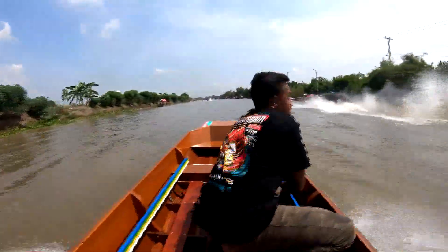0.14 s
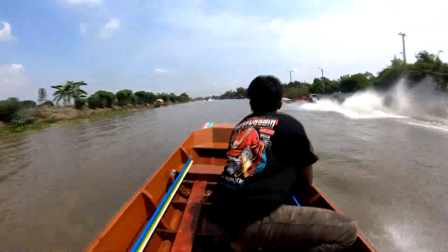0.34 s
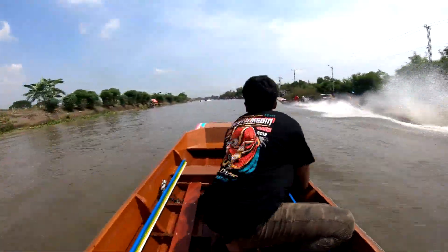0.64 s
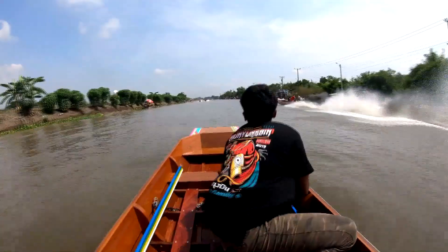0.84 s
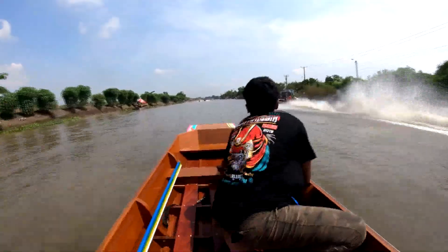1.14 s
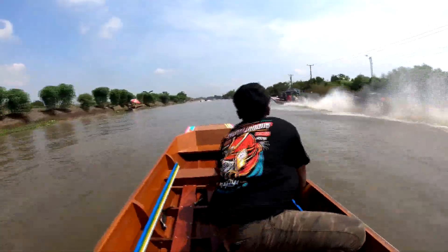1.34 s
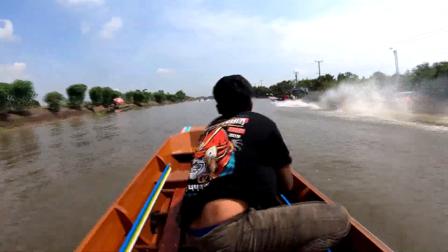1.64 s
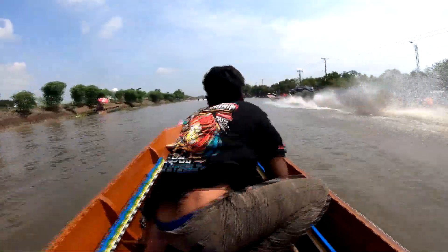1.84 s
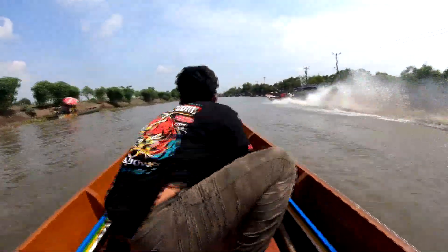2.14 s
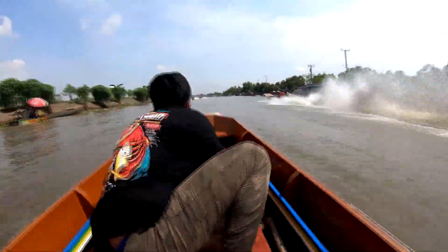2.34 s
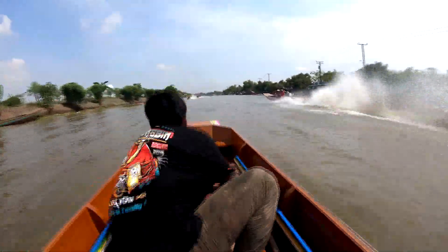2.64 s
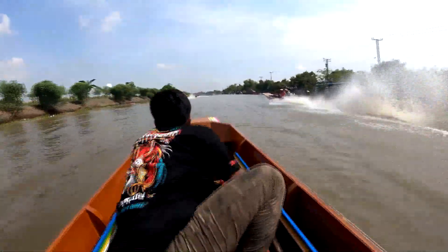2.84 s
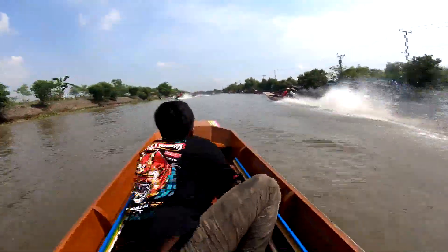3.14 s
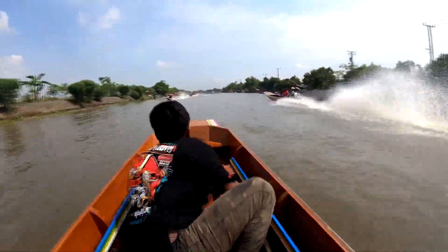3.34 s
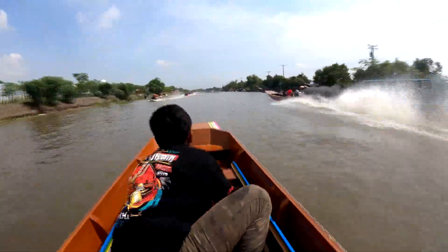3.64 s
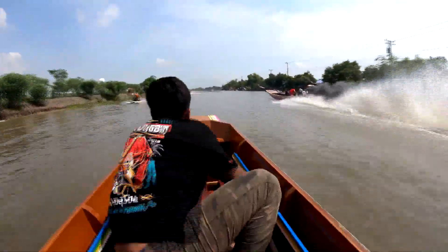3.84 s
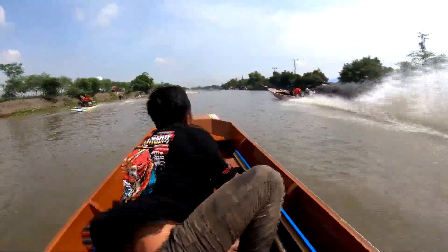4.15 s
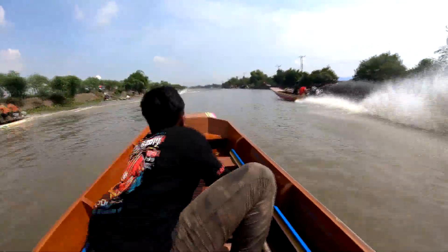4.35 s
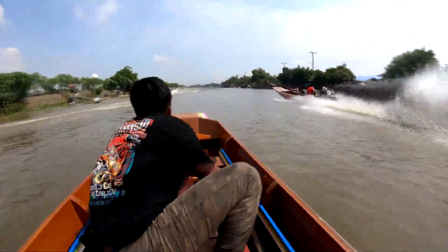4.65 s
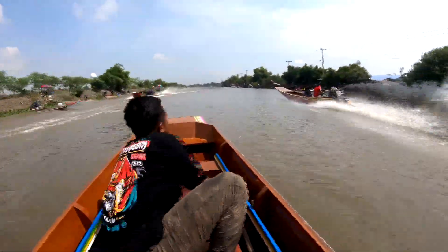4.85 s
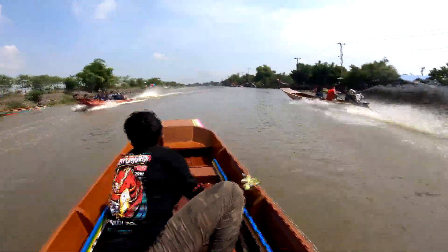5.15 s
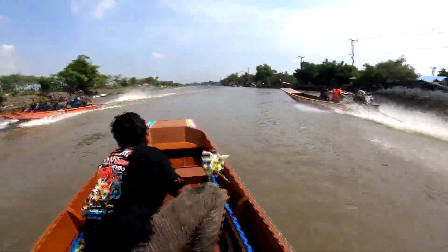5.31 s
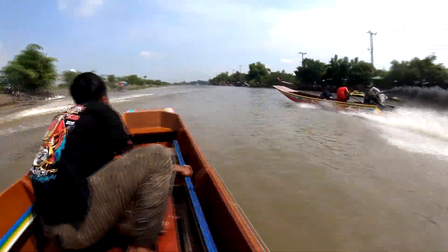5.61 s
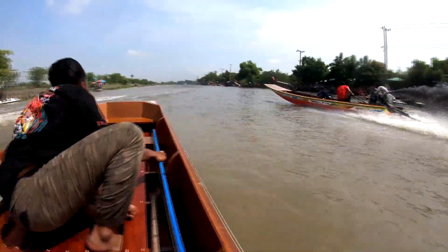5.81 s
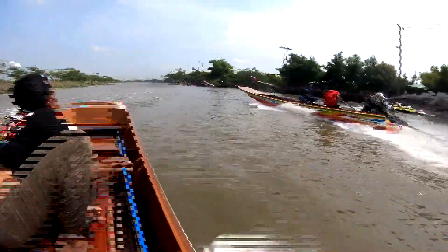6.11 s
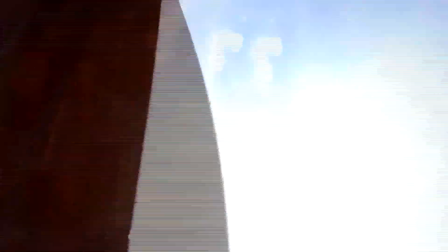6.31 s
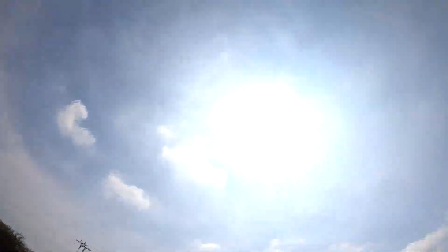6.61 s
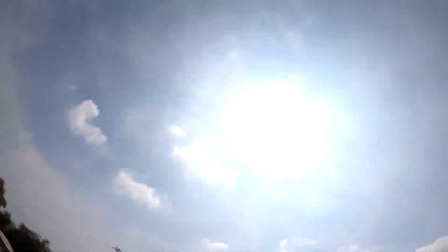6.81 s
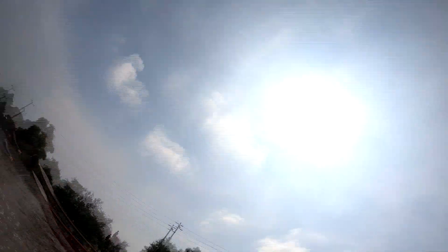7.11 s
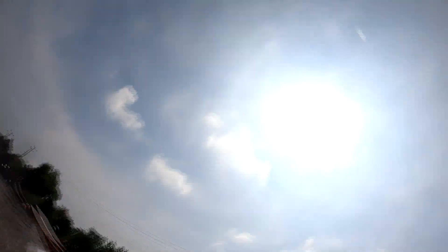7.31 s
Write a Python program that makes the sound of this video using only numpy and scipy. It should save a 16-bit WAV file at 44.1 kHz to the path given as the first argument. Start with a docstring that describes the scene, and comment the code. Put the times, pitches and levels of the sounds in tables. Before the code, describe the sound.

Onboard a speeding river boat: rising motor drone, roaring wind on the microphone, spray spits, regular ticks, a passing boat's falling note, then engine slowdown.

```python
"""Ride in a racing long-tail boat

A turbocharged engine winds up, holds full throttle beside a rival, then backs off: harmonics plus pipe pulses.
Headwind is shaped noise that buffets, roars and crackles, with chirped snaps; turbo air hisses and whistles.
Noise bursts make spray and wash; another boat passes with a falling note.
The waveform itself jumps at regular splices, ticking about every half second, some ticks faint or silent."""
import sys
import numpy as np
from scipy import signal
from scipy.fft import rfft, irfft, next_fast_len
from scipy.io import wavfile
from scipy.ndimage import uniform_filter1d, minimum_filter1d, map_coordinates

SR = 44100
rng = np.random.default_rng(int(sys.argv[2]) if len(sys.argv) > 2 else 0)


def dump_mix(stems):
    """Bounce the given channels to the path in sys.argv[1] as a 16-bit WAV at rate SR."""
    frames = np.atleast_2d(stems).T  # one column per channel
    limited = np.clip(frames, -1, 1)  # hard clip at full scale
    pcm = np.round(limited * 32767).astype(np.int16)
    wavfile.write(sys.argv[1], SR, pcm)


N = 329427

# own engine: (time [s], firing rate [Hz], level [dB])
ENGINE_COURSE = [(0, 102.9, -22), (.17, 109, -20), (.35, 117, -27), (.52, 124, -22.5), (.7, 133, -28.5),
                 (.82, 141, -19.5), (1, 145, -17), (1.37, 150, -20), (1.6, 153, -17), (1.85, 154, -20),
                 (2.5, 155.5, -21.5), (2.8, 155.8, -18), (3.2, 155.5, -20), (3.38, 156, -15),
                 (3.54, 157, -23.5), (3.71, 157.5, -15.5), (3.87, 159.5, -24), (4.95, 161, -24.5),
                 (5.3, 161.3, -22), (5.47, 161.3, -25), (5.58, 161.2, -23), (6.15, 164, -26),
                 (6.25, 174.2, -24.5), (6.35, 162.2, -25), (6.4, 150.9, -17), (6.46, 137.2, -21),
                 (6.55, 133.1, -30), (6.92, 128, -24), (7.05, 111, -19), (7.25, 73, -23.5), (7.47, 66, -32)]
# headwind at the microphone: (time [s], strength [dB], extra crackle [dB])
WIND_COURSE = [(0, -5.5, -5), (.3, -10.5, 2.5), (.62, -1.5, 0), (1.3, -3, -0.5), (1.75, -2.5, -2),
               (2.2, 1.5, 0), (2.4, 1, -5.5), (2.75, -3, 1.5), (3.1, -2.5, 3), (3.4, 0, 2), (3.85, 4.5, -4),
               (4.2, 0.5, 0.5), (4.8, -1, 2), (5.2, -3, 3.5), (5.5, 4.5, -1.5), (5.85, 3.5, -5),
               (6.12, 2.5, -6.5), (6.7, 3.5, -1.5), (7.1, 1.5, -1.5), (7.47, 3.5, -2)]
TOP_HZ = 16000  # upper band limit
TONE_FADE_DB = 31.5  # what a sound gains over its rise and loses over its fade
# the microphone swings into the lee of the hull: the wind drops, stays low, then returns
LEE_S, LEE_DROP_S, LEE_HOLD_S, LEE_RETURN_S = 6.165, 0.058, 0.093, 0.22
LEE_CRACKLE_DB = -16.5


def amp(db):
    """Level to amplitude: 20 dB is a factor of ten."""
    return 10 ** (np.asarray(db) / 20)


def unit(x):
    """Normalise the mean power, so that the rms is 1."""
    return x / np.sqrt(np.mean(x ** 2) + 1e-20)


def curves(rows):
    """Linear interpolation in time: one value per sample for each column after the time."""
    s, *columns = np.transpose(rows)
    t = np.arange(N) / SR
    return [np.interp(t, s, column) for column in columns]


def wobble(rate):
    """Slow random modulation: a smooth spline through random knots, rate of them a second."""
    knots = rng.standard_normal(int(N * rate / SR) + 4)
    return map_coordinates(knots, [np.arange(N) * rate / SR])


def filtered(x, response):
    """Linear filtering: the spectrum of x times a response of frequency."""
    m = next_fast_len(N + SR // 2)
    spectrum = rfft(x, m) * response(np.fft.rfftfreq(m, 1 / SR))
    return irfft(spectrum, m)[..., :N]


def coloured(x, points):
    """Spectral shaping: x filtered along (frequency [Hz], level [dB]) points, at rms 1."""
    f, db = np.transpose(points)
    return unit(filtered(x, lambda hz: amp(np.interp(np.log(hz + 1), np.log(f), db))))


def noise():
    """White noise: equal mean power at every frequency."""
    return rng.standard_normal(N)


def steadied(x, seconds, share):
    """Gain control by short-time power: evens out a share of the chance swells of a noise."""
    power = np.abs(uniform_filter1d(x ** 2, max(int(seconds * SR), 2))) + 1e-3
    return unit(x / power ** (np.clip(share, 0, 1) / 2))


def swell(start, rise, hold, fade):
    """Straight-line envelope: 0 at the start, 1 in the hold, 0 after the fade, below 0 outside."""
    t = np.arange(N) / SR - start
    return np.minimum(1, np.minimum(t / rise, 1 - (t - rise - hold) / fade))


def lee():
    """Aerodynamic shelter: how far the hull shields the microphone, 0-1."""
    return np.maximum(0, swell(LEE_S, LEE_DROP_S, LEE_HOLD_S, LEE_RETURN_S))


def bursts(rows):
    """Exponential attack and decay: envelope of (time [s], level [dB], decay time [s]) bursts."""
    fall_db, rise_share = 8.5, 0.55  # dB lost per decay time, rise time over decay time
    power, t = np.zeros(N), np.arange(N) / SR
    for s, db, decay in rows:
        near = slice(max(0, round((s - 2 * decay) * SR)), round((s + 10 * decay) * SR))
        lag = (t[near] - s) / decay
        power[near] += amp(db - fall_db * np.maximum(lag, -lag / rise_share)) ** 2
    return np.sqrt(power)


def whistle(hz, db, presence, waver):
    """Frequency and amplitude modulation: a tone whose pitch and level waver at random."""
    flutter_db = 3 * wobble(25)
    gain = amp(db + TONE_FADE_DB * (presence - 1) + flutter_db)
    cycles = np.cumsum(hz * (1 + waver * wobble(120))) / SR
    return np.sqrt(2) * gain * np.sin(2 * np.pi * cycles)


def ticks():
    """Step discontinuity: the waveform leans one way, jumps within a sample at a splice and settles."""
    # size of the waveform step on each beat: (height [full scale 1])
    step_heights = [.17, 0.73, 0.28, 0.23, 0.12, 0.65, 0.24, 0.054, .11, 0.067, 0.45, 0.3, 0, 0.33]
    start_s, beat_s, settle_s = .3186, .512, 0.0023
    out, t = np.zeros(N), np.arange(N) / SR
    for beat, height in enumerate(step_heights):
        s = start_s + beat * beat_s
        near = slice(round(s * SR) - SR // 100, round(s * SR) + SR // 100)
        lag = t[near] - s
        side = np.where(lag < 0, -1, 1)
        out[near] += height / 2 * side * np.exp(-np.abs(lag) / settle_s)
    return out


def wind():
    """Turbulence: big eddies buffet, small ones roar, and pressure peaks tear into crackle."""
    # spectra of the three layers: (frequency [Hz], density [dB per Hz])
    buffet_colour = [(10, -38.5), (22, -7), (42, 1), (70, 4.5), (120, 2), (170, -11.5), (260, -33),
                     (500, -86.5)]
    roar_colour = [(70, -7.5), (128, -1), (158, 0), (195, 2), (250, -4.5), (310, -6.5), (410, -14.5),
                   (500, -23), (570, -45.5), (900, -83)]
    crackle_colour = [(400, -12), (570, -6.5), (740, 3.5), (950, -0.5), (1120, -17), (1300, -3.5),
                      (1750, -2.5), (2300, -9), (3100, -15), (3900, -13.5), (5500, -28), (8500, -29),
                      (11000, -58), (14000, -96)]
    # brief changes, mostly lulls, in buffet and roar: (time [s], change [dB])
    lulls = [(.41, -2), (.51, -17), (.75, -11), (1.77, -4), (3.53, -6), (4.11, -3.5), (4.22, -7.5),
             (4.87, -10), (5.1, 0.5)]
    # single gusts that thump in the roar: (time [s], boost [dB])
    gusts = [(.05, 6), (0.461, 9.5), (1.4, 4.5), (2.2, 4), (3.48, 3.5), (4.7, 2.5), (4.83, 7.5)]
    lull_width_s, gust_width_s = 0.013, 0.034  # from the middle to 1/e of the change in dB
    t = np.arange(N) / SR
    strength_db, extra_db = curves(WIND_COURSE)
    shelter = lee()
    eddies = wobble(26)  # fast eddies shake roar and crackle together
    # out of the lee the microphone faces upward, and the roar is softer
    upward = np.clip((t - LEE_S) / LEE_DROP_S, 0, 1)
    gust_db = sum(db * np.exp(-((t - s) / gust_width_s) ** 2) for s, db in gusts)
    lull_db = sum(db * np.exp(-((t - s) / lull_width_s) ** 2) for s, db in lulls)
    # in strong wind the crackle sputters more
    sputter_db = 0.34 * amp(0.49 * strength_db) * eddies

    # each layer: level at strength 0, dB gained per dB of strength, change in the lee
    buffet_db = -17 + 0.053 * strength_db - 10 * shelter + lull_db
    roar_db = -19 + strength_db - 14.5 * shelter - upward + lull_db
    roar_db = roar_db + gust_db + 1.16 * eddies
    crackle_db = -38 + 1.28 * strength_db + LEE_CRACKLE_DB * shelter + extra_db + sputter_db

    buffet = steadied(coloured(noise(), buffet_colour), seconds=0.1, share=0.2)
    uneven = noise() * amp(2.73 * wobble(90))
    roar = steadied(coloured(uneven, roar_colour), seconds=.06, share=.75)
    pressure = np.clip(unit(buffet + roar), -2, 2)
    crackle = coloured(noise() * amp(1.5 * pressure + 2.0 * wobble(60)), crackle_colour)
    return amp(buffet_db) * buffet + amp(roar_db) * roar + amp(crackle_db) * crackle


def torn_air(rows):
    """Broadband turbulence: noise bursts from (time [s], level [dB], decay time [s]) rows."""
    # spectrum of torn air: (frequency [Hz], density [dB per Hz])
    torn_colour = [(300, -9), (570, -5.5), (780, 7.5), (1120, -15), (1400, 0.5), (1800, 1.5), (2600, -9.5),
                   (3500, -7.5), (4600, -24.5), (9000, -44), (13000, -89.5)]
    return bursts(rows) * steadied(coloured(noise(), torn_colour), seconds=0.0035, share=0.24)


def surges():
    """Flow separation: longer surges of torn airflow."""
    # surges: (time [s], level [dB], decay time [s])
    surge_rows = [(1.971, -27, .008), (2.17, -30, .0061), (2.211, -28, 0.0036), (3.764, -27.5, 0.0027),
                  (3.799, -28, 0.0063), (6.192, -23, .004), (6.562, -29, 0.014), (6.583, -31, 0.0077),
                  (6.628, -27, 0.018), (6.662, -29.5, 0.014), (6.691, -29.5, 0.006), (6.754, -26, .005),
                  (6.828, -28, 0.012), (6.86, -31.5, .022), (6.935, -33, 0.022), (7.33, -32.5, 0.023)]
    return torn_air(surge_rows)


def chirp(db, pitch, peak_s):
    """Frequency glide: a quick downward zip rides on a single push and pull of pressure."""
    start_hz, end_hz, glide_s = 3866, 955, 0.00124
    push_hz, push_db = 149, 10
    t = np.arange(SR // 60) / SR
    hz = pitch * (end_hz + (start_hz - end_hz) * np.exp(-t / glide_s))
    envelope = (t / peak_s * np.exp(1 - t / peak_s)) ** 2
    zipping = np.sin(2 * np.pi * np.cumsum(hz) / SR) * envelope
    push = np.sin(2 * np.pi * push_hz * t) * np.sin(np.pi * np.minimum(push_hz * t, 1))
    return amp(db) * (zipping + amp(push_db) * push)


def snaps():
    """Sudden flow separation: loud snaps, and a random patter that grows with the wind."""
    # the loudest snaps: (time [s], level of the zip before its push is added [dB])
    loud_snaps = [(1.2168, -23), (3.7224, -22), (3.7252, -26), (3.7280, -28), (3.7475, -31), (3.7954, -31),
                  (3.8458, -25), (3.8847, -27.5), (3.9056, -19.5), (3.9251, -37), (3.9485, -18.5),
                  (4.002, -24.5), (4.0448, -23.5), (4.0807, -20.5), (4.1316, -25), (4.1675, -26),
                  (4.2269, -27), (4.4245, -24.5), (4.547, -23.5), (4.6679, -24), (4.6998, -28),
                  (6.751, -24)]
    patter_per_s, patter_db, patter_scatter_db, patter_grows = 36, -35, 5, 0.92  # grows: dB per dB
    peak_s, pitch_scatter = 0.0014, .14
    rasp_db, rasp_s = -8, .003  # every snap leaves a short rasp
    strength_db = curves(WIND_COURSE)[0] + LEE_CRACKLE_DB * lee()
    rows = list(loud_snaps)
    for when, size in rng.uniform(size=(int(patter_per_s * N / SR), 2)):
        db = patter_db + patter_grows * strength_db[int(when * N)]
        rows.append((when * N / SR, db + patter_scatter_db * (2 * size - 1)))
    out = np.zeros(N + SR)
    for s, db in rows:
        snap = chirp(db, np.exp(pitch_scatter * rng.standard_normal()), peak_s)
        out[round(s * SR):][:len(snap)] += snap
    rasps = [(s + peak_s, db + rasp_db, rasp_s) for s, db in rows]
    return out[:N] + torn_air(rasps)


def wash():
    """Flow noise: as the boat slows, water rushes steadily along the hull."""
    # spectrum of the rushing water: (frequency [Hz], density [dB per Hz])
    wash_colour = [(500, -28), (1600, 3), (4100, -6), (4900, -29), (9000, -68)]
    start_s, rise_s, level_db = 6.28, 0.64, -40.5
    presence = np.clip((np.arange(N) / SR - start_s) / rise_s, 0, 1)
    return amp(level_db) * presence * coloured(noise() * amp(1.6 * wobble(200)), wash_colour)


def mist():
    """Droplet noise: a puff of fine spray sets in at once and sizzles away raggedly."""
    # spectrum of the fine spray: (frequency [Hz], density [dB per Hz])
    mist_colour = [(9500, -37), (11400, 0), (13000, -3), (15000, -40)]
    presence = swell(start=0.526, rise=0.026, hold=.11, fade=.33)
    level_db = -60 + TONE_FADE_DB * (presence - 1) + 2 * wobble(70)
    return amp(level_db) * coloured(noise(), mist_colour)


def splashes():
    """Impact noise: bright spits of spray strike the boat as band-passed bursts."""
    # spits of spray: (time [s], level [dB], pitch [Hz], decay time [s])
    spits = [(.086, -31, 4930, 0.003), (.262, -33, 5800, .004), (1.16, -32, 5000, 0.0046),
             (1.59, -33.5, 6000, .016), (1.835, -32, 6000, .016), (3.106, -39.5, 4650, 0.0061),
             (4.087, -38.5, 5000, .007), (4.269, -38.5, 4900, 0.0081), (4.343, -39, 5200, 0.0083),
             (4.837, -33.5, 5330, 0.0054), (6.193, -26, 5140, 0.0044), (6.194, -40, 7800, 0.01),
             (6.856, -38, 4870, 0.0054), (7.199, -28, 5330, 0.0037), (7.25, -43.5, 6440, 0.072),
             (7.42, -48, 5800, .04)]
    out = np.zeros(N)
    for s, db, hz, decay in spits:
        edges_hz = [hz * 0.72, min(hz * 1.18, TOP_HZ)]
        band = signal.butter(5, edges_hz, "band", fs=SR, output="sos")
        out += bursts([(s, db, decay)]) * unit(signal.sosfilt(band, noise()))
    return out


def hiss(firings):
    """Modulated flow noise: turbo air and spray throb with the firings under a moving bright edge."""
    # course: (time [s], level before the band narrows [dB], end of the bright part [Hz])
    hiss_course = [(0, -45.5, 8260), (.38, -42.5, 7540), (.6, -38, 7420), (1.9, -40, 7400),
                   (2.77, -48, 6860), (2.95, -55.5, 4040), (4.17, -63, 3880), (4.28, -53, 4530),
                   (4.72, -51.5, 4900), (4.9, -43, 6350), (5.4, -37, 7600), (5.8, -40, 5900),
                   (6.15, -44.5, 5200), (6.44, -39, 4800), (6.73, -48.5, 4400), (7.15, -51, 3740),
                   (7.22, -42.5, 4470), (7.33, -41, 4670), (7.47, -45, 4740)]
    # spectrum of the rushing air: (frequency [Hz], density [dB per Hz])
    air_colour = [(900, -44.5), (1700, -6), (3100, -7), (4100, 0.5), (6300, -1.5), (7200, -8.5), (8300, -1),
                  (9800, -10.5), (12000, -28.5), (13500, -34.5), (15000, -76)]
    level_db, edge_hz = curves(hiss_course)
    throb_db = 0.88 * np.sin(2 * np.pi * firings) + 1.16 * wobble(35)
    air = coloured(noise() * amp(throb_db), air_colour)
    hz, t, z = signal.stft(air, SR, nperseg=512)
    # patches of time and frequency brighten and dim at random
    patches = uniform_filter1d(rng.standard_normal(z.shape), size=5, axis=0)
    patches = unit(uniform_filter1d(patches, size=12, axis=1))
    edge_hz = np.interp(t, np.arange(N) / SR, edge_hz)
    edge_gain = 1 / np.sqrt(1 + (hz[:, None] / edge_hz) ** 60) + amp(-16.0)
    dulled = z * amp(1.8 * patches) * edge_gain
    # a closed edge puts the same strength into a narrower band
    dulled = dulled * (7000 / np.minimum(edge_hz, 7000)) ** 1.46
    # thin spray comes in fits, dense spray is even
    fits_db = np.interp(level_db, [-55, -43], [2, .8]) * wobble(17)
    gain = amp(level_db + fits_db - 9.5 * lee())
    return gain * signal.istft(dulled, SR, nperseg=512)[1][:N]


def oncoming():
    """Doppler effect: a boat goes by the other way, and its note and octave fall as it passes."""
    # passing boat: (time [s], pitch [Hz], level [dB])
    passing = [(5.2, 187, -82), (5.5, 173, -27), (5.8, 130.4, -19), (6, 109, -28), (6.1, 87.6, -25),
               (6.17, 84, -14.5), (6.3, 80.4, -78)]
    hz, db = curves(passing)
    note = whistle(hz, db, 1, waver=0.022)
    return note + whistle(2 * hz, db - 8, 1, waver=0.025)


def rival():
    """Gliding tone: the rival's note sags away at first; later a thin whine draws near."""
    t = np.arange(N) / SR
    hold_s, fade_s = 0.26, 0.18
    leaving = np.minimum(1, 1 - (t - hold_s) / fade_s)
    nearing = swell(start=4.2, rise=0.44, hold=1.1, fade=0.49)
    sagging_hz = 305.4 - 73 * t
    note = whistle(sagging_hz, -33.5, leaving, waver=0.0044)
    return note + whistle(1815, -51.5, nearing, waver=.006)


def boom():
    """Low-frequency tone: a deep boom wavers under the engine while the boat gathers speed."""
    presence = swell(start=.65, rise=.14, hold=1.45, fade=.3)
    return whistle(63.7, -27.5, presence, waver=0.112)


def turbo():
    """Tone locked to rotation: the whistle climbs with the firing rate, then sinks into the hiss."""
    presence = swell(start=0, rise=.9, hold=0.91, fade=0.4)
    whistle_hz = 40.6 * curves(ENGINE_COURSE)[0]
    return whistle(whistle_hz, -52.5, presence, waver=0.022)


def engine(firings):
    """Harmonic series and pulse excitation: low orders drone, uneven firings rasp through the pipe."""
    # strong low orders: (multiple of the firing rate [1], level [dB])
    low_orders = [(.5, -15), (1, 0.12), (1.5, -20), (2, -17.5), (2.5, -24.5)]
    # orders that sing while they climb through a pipe resonance:
    # (multiple of the firing rate [1], centre [Hz], half width [Hz], level [dB])
    singing_orders = [(3, 358, 18, -14), (6, 775, 62, -24.5)]
    # colour of the exhaust pulses: (frequency [Hz], level [dB])
    pipe_colour = [(200, -35), (400, 10), (570, 0), (780, 8.5), (1120, -20), (1600, -8.5), (3000, -22.5),
                   (8000, -53.5), (13000, -98)]
    firing_hz, level_db = curves(ENGINE_COURSE)
    drone = np.zeros(N)
    for order, db in low_orders:
        unrest = 0.046 + 0.49 * abs(order - 1)  # the firing order is the steadiest
        gain = amp(db + 0.7 * wobble(10.0))
        drone += gain * np.sin(2 * np.pi * order * firings + unrest * wobble(18))
    climbing = uniform_filter1d(1.0 * (np.gradient(firing_hz) > 0), size=2000)
    for order, hz, width_hz, db in singing_orders:
        resonance = 1 / (1 + ((order * firing_hz - hz) / width_hz) ** 8)
        sing = climbing * amp(db + 3.5 * wobble(24)) * resonance
        drone += sing * np.sin(2 * np.pi * order * firings)
    scatter = .03 * wobble(110)  # firings are unevenly spaced, in cycles
    pulses = np.diff(np.floor(firings + scatter), prepend=0) * amp(3.4 * noise())
    rasp = amp(-28.5) * coloured(pulses, pipe_colour)
    return amp(level_db) * (np.sqrt(2) * drone + rasp)


def scene():
    """Superposition: engines, wind, water and splice ticks add into one signal."""
    firing_hz = curves(ENGINE_COURSE)[0] * (1 + .003 * wobble(14))
    firings = np.cumsum(firing_hz) / SR  # running count of firings
    boats = engine(firings) + turbo() + boom() + rival() + oncoming()
    air = wind() + hiss(firings) + snaps() + surges()
    water = splashes() + mist() + wash()
    return (boats + air + water + ticks())[None]


def record(dry):
    """Limiting and low-pass filtering: smoothed gain holds peaks down, then the band is cut."""
    needed = np.minimum(1, .76 / (np.abs(dry) + 1e-9))
    gain = uniform_filter1d(minimum_filter1d(needed, size=500), size=400)
    low_pass = signal.ellip(10, .1, 90, TOP_HZ, fs=SR, output="sos")
    return signal.sosfilt(low_pass, dry * gain)


dry = scene()
out = record(dry)
dump_mix(out)
```